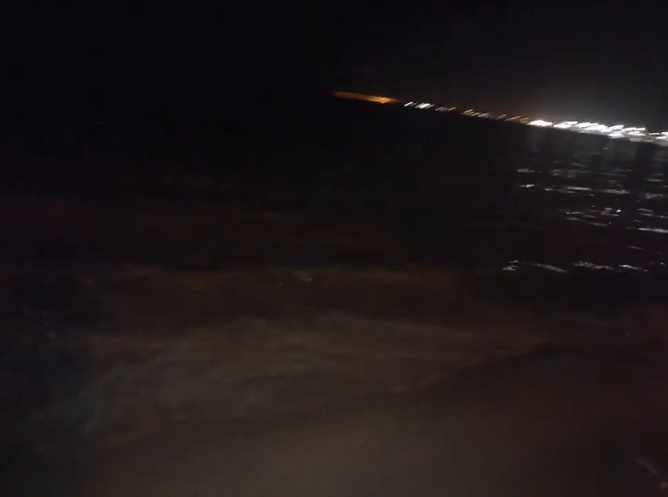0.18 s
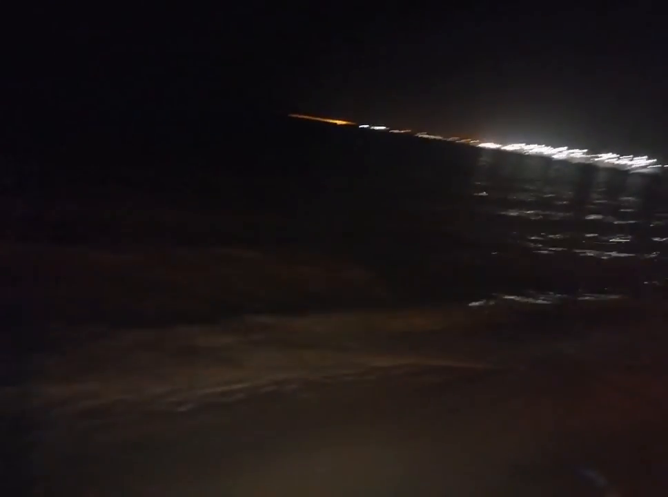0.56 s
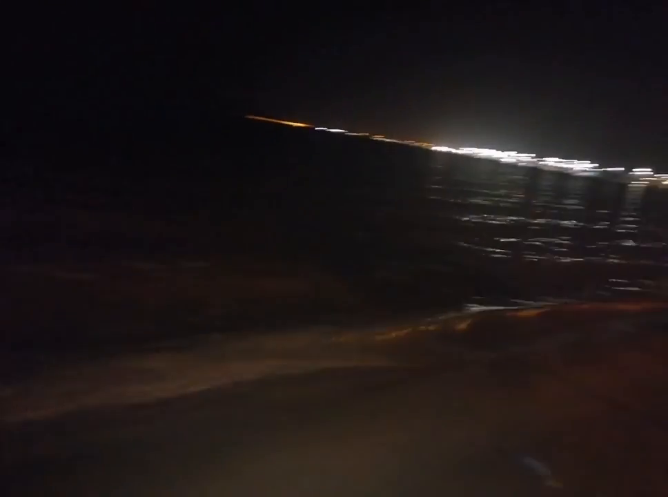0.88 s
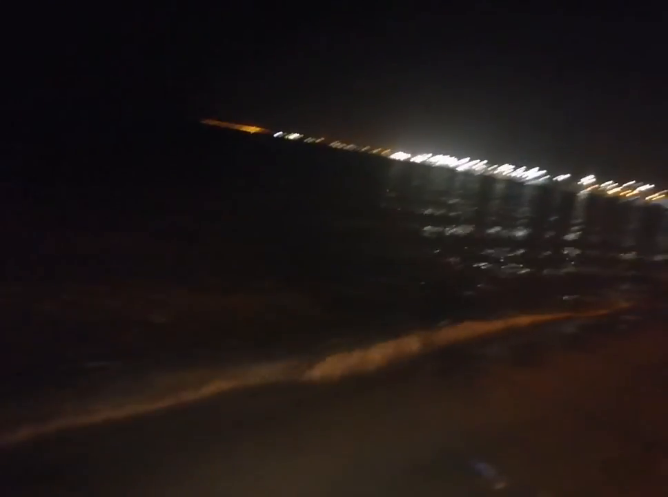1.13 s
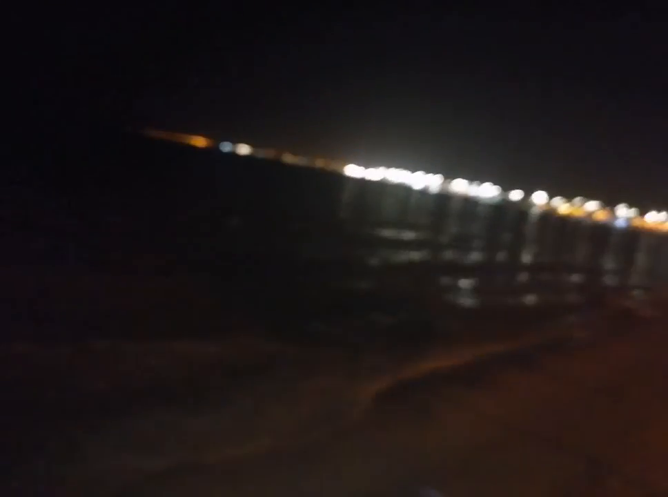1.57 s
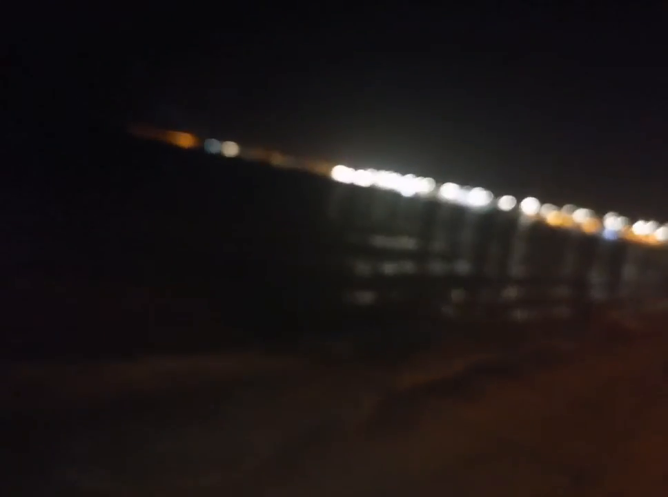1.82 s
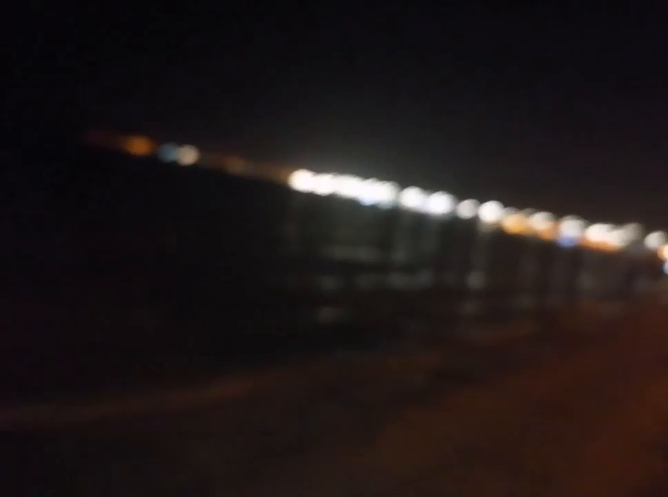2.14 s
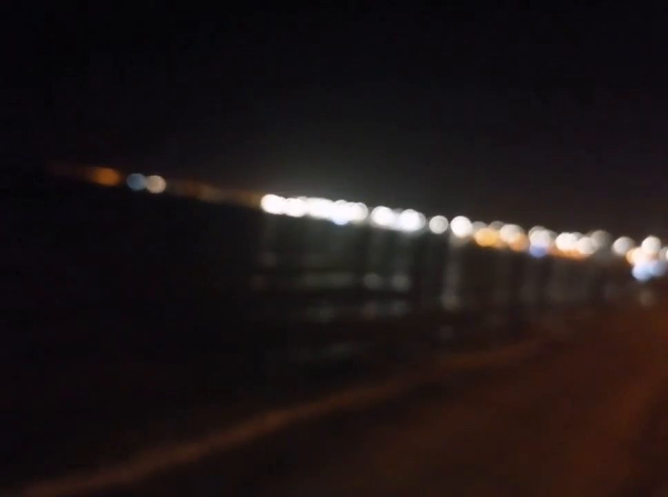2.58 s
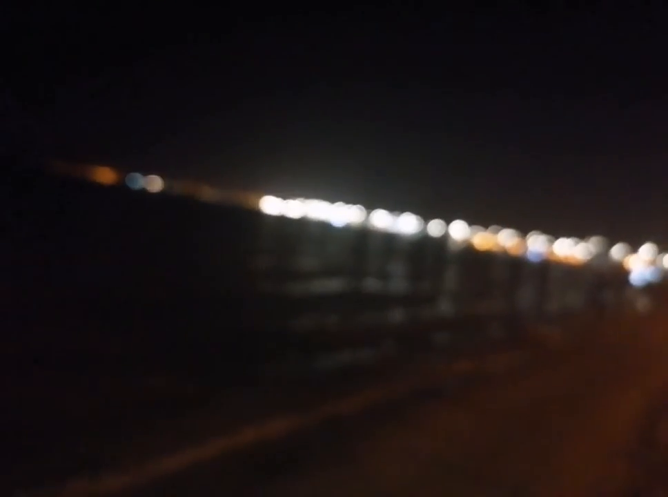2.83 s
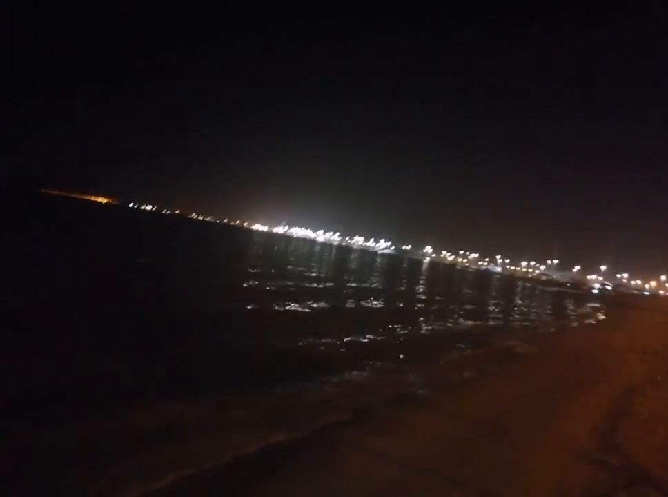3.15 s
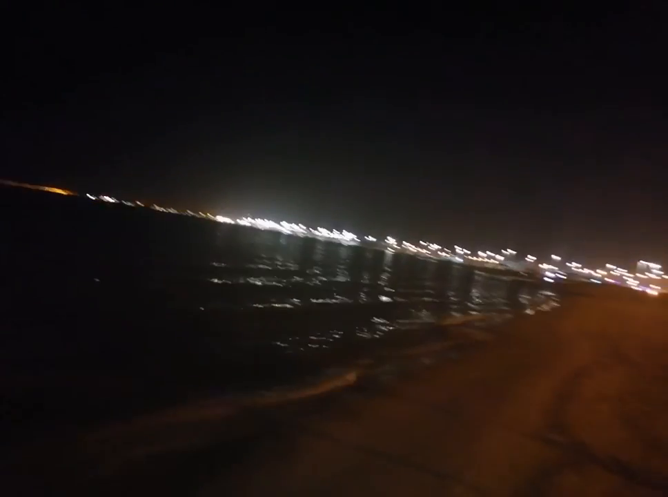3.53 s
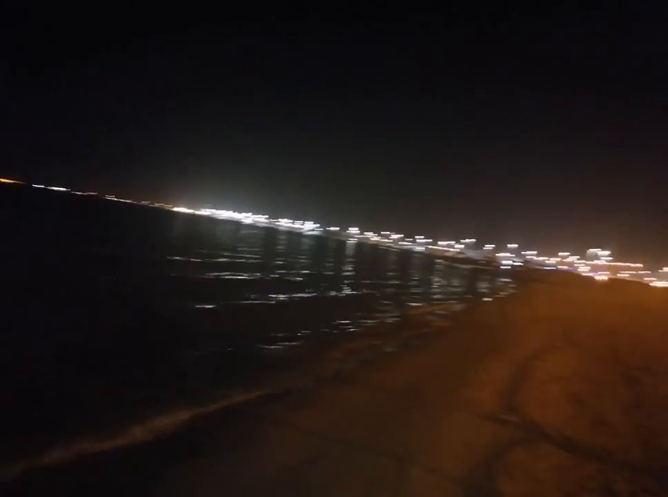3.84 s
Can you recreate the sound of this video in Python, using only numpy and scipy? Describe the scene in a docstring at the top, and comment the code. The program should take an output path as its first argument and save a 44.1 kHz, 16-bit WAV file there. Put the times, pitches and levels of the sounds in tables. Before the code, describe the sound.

Small waves break close by on a sandy beach at night, one around one second, a stronger one past two, then weak laps, with wind rumbling and thumping on a handheld microphone.

```python
"""Small waves tumble onto a sandy beach: two close ones and some weaker laps, over the far wash of the sea.
Gusts of wind buffet the microphone, trapped air gulps in the water, and a faint hum wavers behind it.
Waves are patchy noise and dense bubble blips; far sea, wind, laps and spray are shaped noise.
Hum, gulps and buffets are sines that waver, rise in pitch or die away at once."""
import sys
import numpy as np
from scipy import signal
from scipy.fft import rfft, irfft
from scipy.io import wavfile
from scipy.ndimage import uniform_filter1d

SR = 44100
rng = np.random.default_rng(int(sys.argv[2]) if len(sys.argv) > 2 else 0)


def dump_mix(stems):
    """Bounce the given channels to the path in sys.argv[1] as a 16-bit WAV at rate SR."""
    frames = np.atleast_2d(stems).T  # one column per channel
    limited = np.clip(frames, -1, 1)  # hard clip at full scale
    pcm = np.round(limited * 32767).astype(np.int16)
    wavfile.write(sys.argv[1], SR, pcm)


N = 176400  # 4 s

# slow balance of the low end: t/s, deep rumble gain/dB, hum gain/dB
DEPTH = [(0, 0, -2), (1, 1.5, 1.5), (2, 2.5, -1), (2.6, -4.5, 4), (3.1, 4.5, 1), (3.6, 6.5, 5), (4, 1, 1.5)]


def gain_of(db):
    """Amplitude factor for a level in dB."""
    return 10 ** (np.asarray(db) / 20)


def evened(x):
    """Scales a signal to an rms of one."""
    return x / np.sqrt(np.mean(x ** 2) + 1e-20)


def read(points, hz):
    """Reads a colour curve, in straight lines over log frequency."""
    f, value = np.transpose(points)
    return np.interp(np.log(hz + 1), np.log(f + 1), value)


def add(mix, s, sound):
    """Mixes a sound in at a time in seconds, cut off at the end of the scene."""
    part = mix[round(s * SR):][:len(sound)]
    part += sound[:len(part)]


def track(table, column):
    """One column of a time table at every sample."""
    rows = np.array(table)
    return np.interp(np.arange(N) / SR, rows[:, 0], rows[:, column])


def coloured(x, db_at):
    """Filters by a gain in dB that is a function of frequency."""
    gain = gain_of(db_at(np.fft.rfftfreq(N, 1 / SR)))
    return irfft(rfft(x) * gain, N)


def band(x, lo_hz, hi_hz):
    """The part between two frequencies, with soft edges."""
    hz = np.fft.rfftfreq(N, 1 / SR) + 1
    low_edge = 1 + (lo_hz / hz) ** 8
    high_edge = 1 + (hz / hi_hz) ** 8
    return irfft(rfft(x) / np.sqrt(low_edge * high_edge), N)


def patchy(patch_db, flicker_db, patch_frames):
    """White noise with drifting patches and a flicker shared across wide bands."""
    # frequency bins (86 Hz) by frames (2.9 ms)
    real, imaginary, patches, flicker = rng.standard_normal((N // 128 + 5, 257, 4)).T
    patches = uniform_filter1d(patches, 6, axis=0)
    patches = evened(uniform_filter1d(patches, patch_frames, axis=1))
    flicker = uniform_filter1d(flicker, 90, axis=0)
    flicker = evened(uniform_filter1d(flicker, 4, axis=1))
    spectrum = (real + 1j * imaginary) * gain_of(patch_db * patches + flicker_db * flicker)
    return evened(signal.istft(spectrum, nperseg=512, noverlap=384)[1][:N])


def far_sea():
    """The distant breakers blur into one steady wash of softly patchy noise."""
    # colour of the far wash: f/Hz, level/dB
    far_colour = [(240, -43), (400, -11), (566, -12), (814, 0), (1610, -21.5), (2350, -15.5), (14900, -32)]
    level_db = -79.5
    noise = patchy(2.7, 0.88, patch_frames=30)
    wash = coloured(noise, lambda hz: read(far_colour, hz))
    return gain_of(level_db) * evened(band(wash, 330, SR))


def hum():
    """Faint sine tones whose pitch and level waver at random."""
    # tones: f/Hz, base level/dB, width/Hz (twice the rms pitch drift)
    hum_tones = [(95.4, -65, 2.41), (246, -77, 1.4)]
    out = np.zeros(N)
    for hz, db, width in hum_tones:
        drift = evened(band(rng.standard_normal(N), 0.25, 4.18))
        swell = evened(band(rng.standard_normal(N), 0.25, 4.18))
        phase = 2 * np.pi * np.cumsum(hz + width / 2 * drift) / SR
        out += gain_of(db + 2.9 * swell) * np.sqrt(2) * np.sin(phase)
    return out * gain_of(track(DEPTH, column=2))


def lumps(depth_db, lo_hz, hi_hz):
    """A gain that swells and sags irregularly, as turbulent air does."""
    return gain_of(depth_db * evened(band(rng.standard_normal(N), lo_hz, hi_hz)))


def wind():
    """Turbulence on the microphone: a lumpy rumble with a flutter above it, both riding the gusts."""
    # gusts: t/s, level/dB, flutter above the rumble/dB
    gust_levels = [(0.0, -59, -30), (0.03, -56.5, -13), (0.34, -53, -15), (0.44, -46, -21),
                   (0.49, -55.5, -11), (0.62, -44.5, -19.5), (0.68, -61.5, -3), (0.76, -49, -9.5),
                   (0.88, -59, -11), (1.04, -50.5, -3.5), (1.11, -60.5, 2.5), (1.22, -62, -9),
                   (1.93, -55.5, -6.5), (2.09, -43.5, -8), (2.14, -61, -6.5), (2.26, -52, -1.5),
                   (2.29, -64, -2), (2.37, -47.5, -13.5), (2.45, -40, -8.5), (2.6, -51, 3.5),
                   (2.74, -42, -18), (2.77, -60, -2.5), (2.86, -44, -17), (2.97, -62.5, -7.5),
                   (3.04, -41, -14), (3.12, -64, -1), (3.29, -46.5, -1), (3.31, -42.5, -4.5),
                   (3.44, -55.5, -4.5), (3.5, -44.5, -8.5), (3.59, -55.5, -10.5), (3.61, -45, -10),
                   (3.68, -58.5, -10), (3.71, -46.5, -17), (3.75, -54.5, -3.5), (3.8, -41, -9.5),
                   (3.87, -57, -3.5), (3.92, -58, -16), (4.0, -58.5, -5)]
    # colour of the rumble ahead of its band split: f/Hz, level/dB
    rumble_colour = [(9, -40), (18, -4.5), (50, -2), (78, -7), (96, 0.5), (124, -11.5), (150, -8),
                     (200, -35.5), (330, -120)]
    # colour of the flutter: f/Hz, level/dB
    flutter_colour = [(60, -25), (140, 2.5), (250, -0.5), (400, -18), (800, -45), (1600, -64)]

    rumble = coloured(rng.standard_normal(N), lambda hz: read(rumble_colour, hz))
    deep = band(rumble, 16, 63) * gain_of(track(DEPTH, column=1))
    rumble = evened((deep + band(rumble, 70, 150)) * lumps(1.5, 3.9, 36))

    flutter = coloured(rng.standard_normal(N), lambda hz: read(flutter_colour, hz))
    flutter = evened(flutter * lumps(2.5, 2.6, 55))
    flutter *= gain_of(track(gust_levels, column=2))
    return gain_of(track(gust_levels, column=1)) * (rumble + flutter)


def buffets():
    """Hard knocks of wind on the microphone: a low sine that swells and dies within three cycles."""
    # buffets: t/s, nominal level/dB, f/Hz
    buffet_hits = [(2.574, -37.5, 145), (3.308, -37.5, 111.6)]
    out = np.zeros(N)
    for s, db, hz in buffet_hits:
        cycles = np.arange(0, 3 / hz, 1 / SR) * hz
        shape = 2 * cycles * np.exp(1 - 1.8 * cycles ** 2)
        add(out, s, gain_of(db) * shape * np.sin(2 * np.pi * cycles))
    return out


def gulps():
    """Trapped air pockets ring in the water as short sines that rise in pitch."""
    # air pockets: t/s, peak level/dB, starting f/Hz, length/s, rise by the end/share of f
    air_pockets = [(1.04, -55, 230, 0.111, 0.502), (2.21, -47, 246, 0.022, .1),
                   (2.66, -38, 437, 0.012, 0.13), (.548, -59.5, 1280, 0.011, .1),
                   (3.42, -56, 720, 0.023, 0.24), (2.634, -47, 1010, 0.011, 0.11),
                   (0.9, -51, 600, 0.019, 0.094)]
    out = np.zeros(N)
    for s, db, hz, length, rise in air_pockets:
        t = np.arange(0, length, 1 / SR)
        swell = np.sin(np.pi * t / length)
        tone = np.sin(2 * np.pi * hz * t * (1 + rise * t / length / 2))
        add(out, s, gain_of(db) * swell * tone)
    return out


def spray():
    """Splashes of spray: narrow puffs of noise with a quick attack and a fast decay."""
    # splashes: t/s, nominal level/dB, nominal f/Hz (the puff sits a little below)
    splashes = [(.211, -61, 4120), (.314, -66, 2500), (.388, -63, 4500), (.549, -66, 3500),
                (0.649, -53, 4200), (.658, -64, 7000), (0.693, -56, 1600), (.843, -50, 8000),
                (1.157, -45.5, 3300), (1.134, -55, 10500), (1.193, -60, 9000), (2.098, -53, 5000),
                (2.549, -49, 12100), (2.629, -43, 5000), (2.743, -60, 5200)]
    attack_s, t60_s = 0.0017, 0.05
    out = np.zeros(N)
    t = np.arange(2000) / SR
    for s, db, hz in splashes:
        shape = np.minimum(t / attack_s, 1) * gain_of(db - 60 * t / t60_s)
        puff = band(rng.standard_normal(N), 0.81 * hz, 0.85 * hz)[:2000]
        add(out, s, shape * puff / abs(puff[:300]).max())
    return out


def hisses():
    """Narrow hisses in the laps: short, grainy swells of noise, each in one gliding band."""
    # hisses: t/s, length/s, first f/Hz, last f/Hz, nominal width/Hz, level at the top of the swell/dB
    lap_hisses = [(0.2, 0.26, 4500, 4800, 870, -84), (.21, 0.054, 1900, 1600, 700, -74),
                  (0.53, 0.2, 2000, 3200, 370, -77), (.5, 0.22, 3900, 4300, 560, -76.5),
                  (3.22, 0.34, 2550, 2600, 90, -75.5), (3.22, 0.33, 4500, 4200, 1400, -72),
                  (3.74, .4, 1450, 1250, 490, -64.5), (3.42, 0.26, 850, 800, 260, -69),
                  (2.68, .09, 2400, 2500, 150, -66.5), (3.18, .3, 330, 520, 260, -61.5),
                  (.2, .25, 950, 1000, 200, -75), (1.25, .75, 850, 800, 220, -76.5)]
    out = np.zeros(N)
    for s, length, first_hz, last_hz, width, db in lap_hisses:
        u = np.arange(0, 1, 1 / (length * SR))  # 0 to 1 through the hiss
        noise = rng.standard_normal((3, SR))
        # slow noise on a gliding carrier makes a band around the carrier
        pole = np.exp(-np.pi * width / SR)
        slow = signal.lfilter([1], np.poly([pole, pole]), noise)[:, -len(u):]
        phase = 2 * np.pi * np.cumsum(first_hz + (last_hz - first_hz) * u) / SR
        glide = slow[0] * np.cos(phase) + slow[1] * np.sin(phase)
        grain = gain_of(1.3 * evened(uniform_filter1d(noise[2], size=400))[:len(u)])
        swell = abs(np.sin(np.pi * u ** 0.98)) ** 0.68
        add(out, s, gain_of(db) * swell * evened(grain * glide))
    return out


def bubbles():
    """Dense tiny rising blips of all sizes, equal power per hertz on average."""
    nominal_per_s, turns, spread_db = 5000, 4.96, 2.5
    out = np.zeros(N)
    for hz in np.geomspace(350, 14000, 30):
        t = np.arange(0, 3 * turns / hz, 1 / SR)
        u = t * hz / turns
        blip = np.sin(2 * np.pi * hz * t * (1 + 0.051 * u)) * u * np.exp(-2.5 * u)
        loudness = gain_of(spread_db * np.minimum(rng.exponential(1, N), 3.5))
        share = 1.4 * (hz / 14000) ** .25 / 30  # small, high bubbles are more frequent
        births = rng.random(N) < nominal_per_s * share / SR
        out += np.sqrt(hz) * evened(signal.oaconvolve(loudness * births, blip)[:N])
    return evened(out)


def waves():
    """Near breakers of foam and bubbles; tumble, body and fizz follow each wave by different amounts."""
    # near water: t/s, body level/dB, then low tumble, fizz and finest fizz, each above the body/dB
    wave_levels = [(0.0, -88, 8.5, -2.5, -5), (0.37, -81, 12, -3.5, -12.5), (0.51, -74, -6, -16, -16),
                   (0.62, -63, -2.5, -19, -19), (0.72, -62, 0.5, -4.5, -12.5), (0.87, -59.5, -1.5, -4, -8),
                   (1.0, -60.5, -1.5, -3, -10), (1.07, -59.5, 2.5, -1.5, -8.5), (1.16, -63.5, 4, -3, -8.5),
                   (1.18, -67.5, 2, -1.5, -12.5), (1.27, -80, 2, -2, -8), (1.54, -84, 5, -1.5, -8.5),
                   (1.97, -84.5, 9, -1, -7.5), (2.09, -63.5, -4.5, -4.5, -11.5),
                   (2.175, -60.5, -9, -5, -11.5), (2.27, -56, -6.5, -6.5, -12),
                   (2.53, -52.5, 2, -11.5, -12), (2.65, -54.5, 3, -9.5, -9), (2.67, -59.5, 13.5, -8, -6.5),
                   (2.748, -60.5, -2, -17, -16.5), (2.765, -70.5, 5.5, -14, -11.5),
                   (2.87, -75.5, 3, -6, -11.5), (3.16, -82.5, 3.5, -2.5, -5), (3.33, -73, 0.5, -1.5, -7.5),
                   (3.39, -75, 8, -4.5, -5), (3.53, -67.5, 2, -4.5, -10), (3.59, -75, 5, -3.5, -7),
                   (3.74, -70, -0.5, -10, -11.5), (3.8, -58.5, -8, -18.5, -20.5),
                   (3.92, -76.5, 12.5, -4.5, -7), (3.99, -71.5, 7, -8, -11.5)]
    # colour of breaking water ahead of its band split: f/Hz, level/dB
    foam_colour = [(180, -32), (300, 14), (430, 6), (620, 8), (850, 5), (1250, -2.5), (1750, -5),
                   (2450, -3.5), (2850, -10.5), (3400, -17), (4500, -18), (5500, -25.5), (8000, -24.5),
                   (10700, -35.5), (13600, -31.5), (14900, -46)]
    bubble_share = 0.26  # of the power
    foam = patchy(1.7, 1.58, patch_frames=16)
    water = np.sqrt(1 - bubble_share) * foam + np.sqrt(bubble_share) * bubbles()
    water = coloured(water, lambda hz: read(foam_colour, hz))

    tumble = evened(band(water, 330, 1140)) * gain_of(track(wave_levels, column=2))
    body = evened(band(water, 1140, 3215))
    fizz = evened(band(water, 3215, 5450)) * gain_of(track(wave_levels, column=3))
    finest_fizz = evened(band(water, 5450, SR)) * gain_of(track(wave_levels, column=4))
    return gain_of(track(wave_levels, column=1)) * (tumble + body + fizz + finest_fizz)


def scene():
    """All layers in one channel, from the background to the near waves."""
    background = far_sea() + hum() + wind() + buffets()
    water = gulps() + spray() + hisses() + waves()
    return (background + water)[None]


def record(dry):
    """A steep low-pass at 15 kHz limits the band."""
    low_pass = signal.firwin(511, 15000, window=("kaiser", 9), fs=SR)
    return signal.oaconvolve(dry, low_pass[None], "same")


dry = scene()
out = record(dry)
dump_mix(out)
```